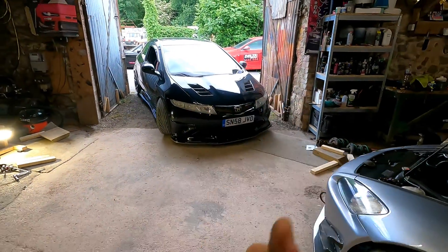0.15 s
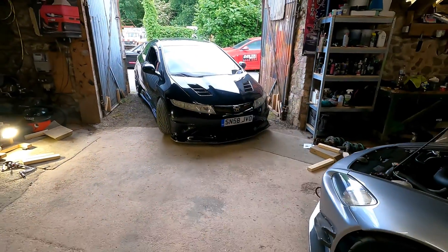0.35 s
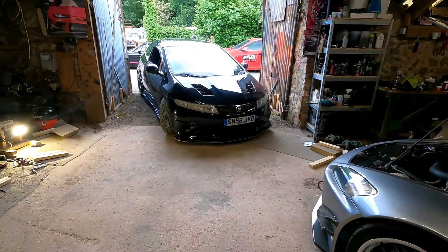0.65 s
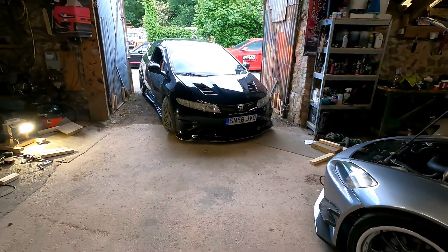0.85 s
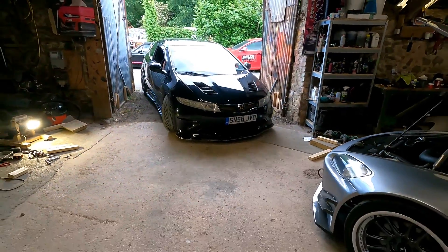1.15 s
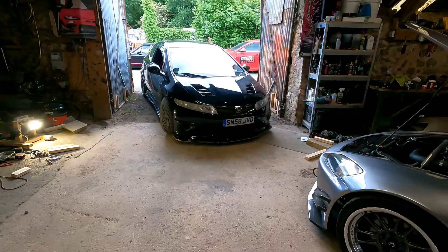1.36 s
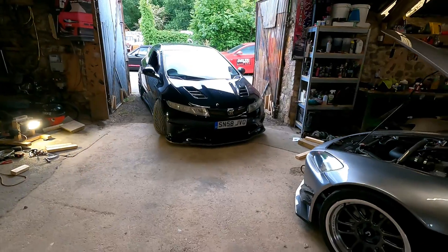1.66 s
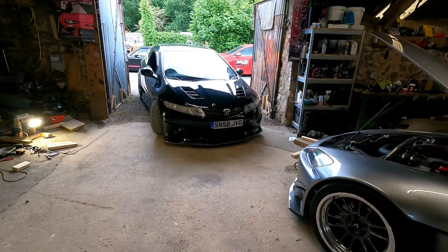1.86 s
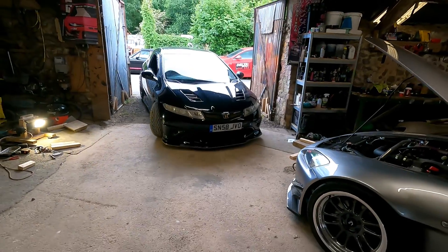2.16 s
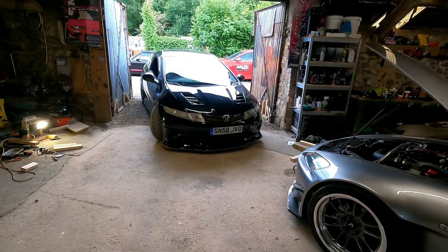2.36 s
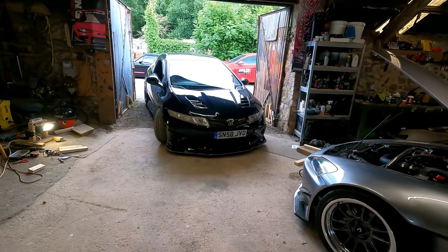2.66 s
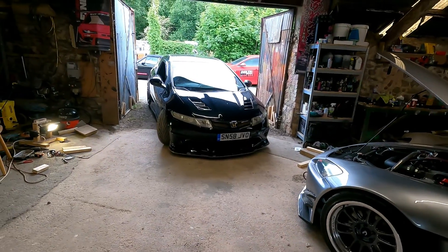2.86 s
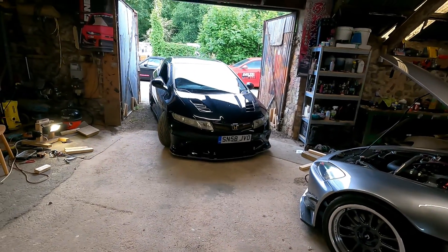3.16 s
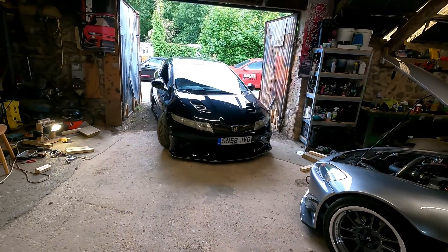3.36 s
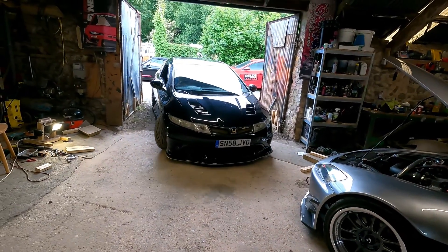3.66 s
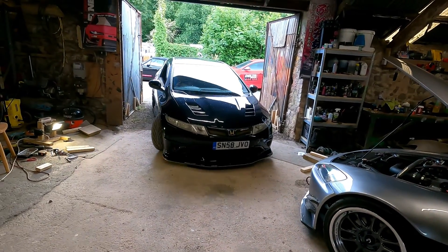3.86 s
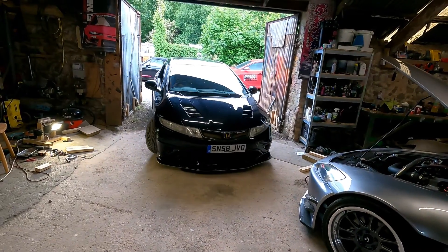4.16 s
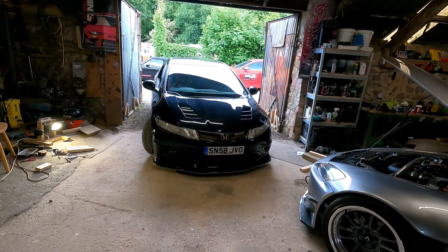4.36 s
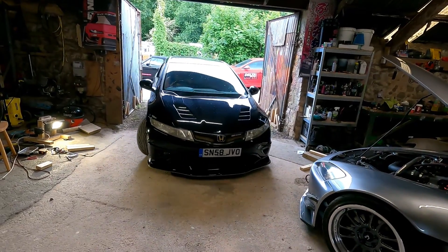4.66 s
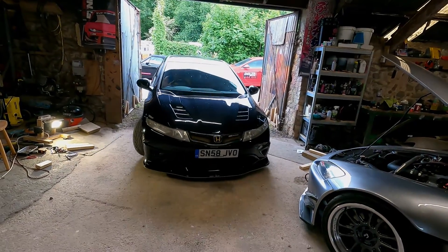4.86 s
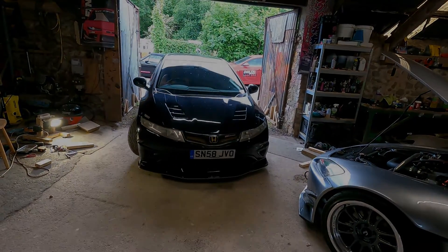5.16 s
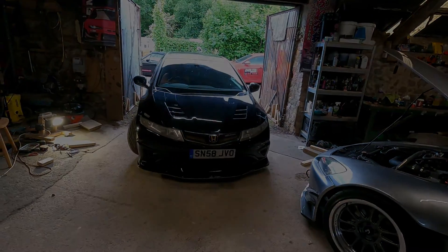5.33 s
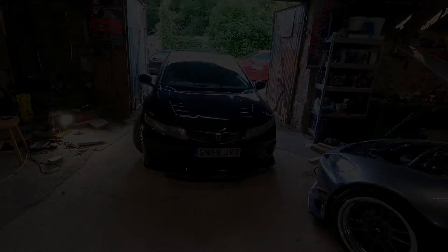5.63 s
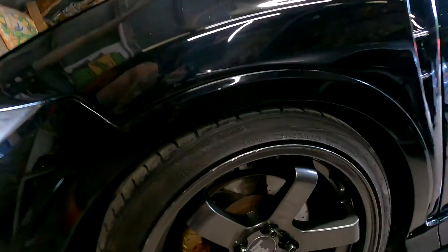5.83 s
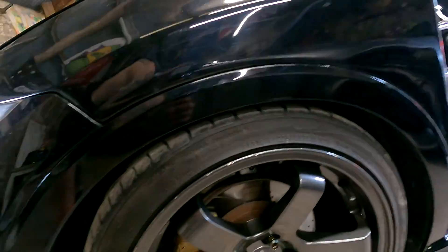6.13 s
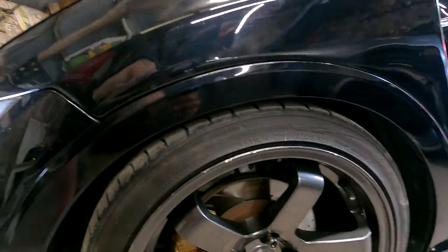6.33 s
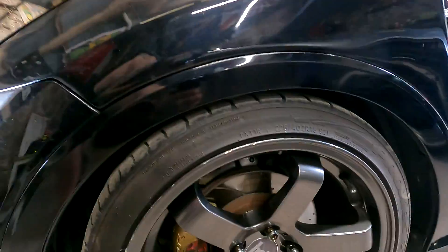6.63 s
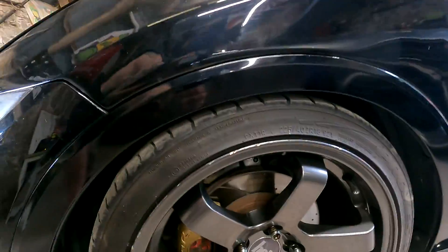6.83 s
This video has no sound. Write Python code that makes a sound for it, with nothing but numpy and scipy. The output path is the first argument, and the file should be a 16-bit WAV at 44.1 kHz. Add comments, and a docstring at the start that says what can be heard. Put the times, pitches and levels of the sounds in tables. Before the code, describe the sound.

A four-cylinder car idles into a workshop, gets two quick throttle revs, settles and fades to silence, then idles again close beside the wheel.

```python
"""Car revved in a workshop

A four-cylinder car idles into a workshop, is revved twice and settles; the sound fades to silence.
After a cut the microphone is beside the wheel of the idling car. Exhaust tones are cosines locked to
the firing phase, booming in pipe and shed; engine bay, gas flow and intake are shaped noise, with
ringing modes for the block, wavering sines for the whistle and short knocks for grit under the tyres."""
import sys
import numpy as np
from scipy import signal
from scipy.fft import rfft, irfft, next_fast_len
from scipy.io import wavfile
from scipy.ndimage import uniform_filter1d, map_coordinates

SR = 44100
rng = np.random.default_rng(int(sys.argv[2]) if len(sys.argv) > 2 else 0)


def waveform_to_disk(signal):
    """Save audio, clipped to [-1, 1], as 16-bit WAV at the path in sys.argv[1]."""
    frames = np.transpose(np.atleast_2d(signal))
    scaled = np.clip(frames, -1, 1) * 32767
    samples = np.round(scaled).astype(np.int16)
    wavfile.write(sys.argv[1], SR, samples)


def volts_from_decibels(level):
    """Turn decibel levels (scalar or array-like) into linear amplitude factors."""
    exponent = np.asarray(level, float) / 20
    return 10 ** exponent


N = 308259
CUT = 5.826  # s, the microphone moves to the wheel


def unit(x):
    """Scaled to rms 1."""
    return x / np.sqrt(np.mean(x ** 2) + 1e-20)


def along(points, hz):
    """Reads (f/Hz, value) points on a log frequency axis."""
    f, value = np.transpose(points)
    return np.interp(np.log(hz + 1), np.log(f + 1), value)


def curves(rows):
    """One value per sample for each column after the time."""
    s, *columns = np.transpose(rows)
    return [np.interp(np.arange(N) / SR, s, column) for column in columns]


def wobble(rate):
    """A smooth random curve with rate knots a second."""
    return map_coordinates(rng.standard_normal(N // 200), [np.arange(N) * rate / SR])


def between(t0, t1, edge):
    """Gate: 1 from t0 to t1, with soft edges in seconds."""
    t = np.arange(N) / SR
    opening = np.clip((t - t0) / edge + 0.5, 0, 1)
    closing = np.clip((t1 - t) / edge + 0.5, 0, 1)
    return opening * closing


def filtered(x, response):
    """x times a complex response of frequency, padded so that tails do not wrap."""
    m = next_fast_len(N + SR)
    return irfft(rfft(x, m) * response(np.fft.rfftfreq(m, 1 / SR)), m)[..., :N]


def resonances(modes):
    """Causal response of (f/Hz, width/Hz, level/dB) modes, alternating in sign."""
    def response(f):
        total = 0
        for i, (centre, width, db) in enumerate(modes):
            damping = 1j * f * width
            total = total + (-1) ** i * volts_from_decibels(db) * damping / (centre ** 2 - f ** 2 + damping)
        return total
    return response


# likeness of left and right before the spread is applied: (f/Hz, correlation)
LIKENESS = [(60, .998), (180, .99), (540, .75), (1600, .7), (4800, .7), (8000, .85), (14000, .6)]


def noise(spectrum, spread):
    """Stereo noise of rms 1; spread scales the angle by which left and right differ."""
    def mid_side(hz):
        angle = spread * np.arccos(np.clip(along(LIKENESS, hz), -1, 1)) / 2
        return volts_from_decibels(along(spectrum, hz)) * [np.cos(angle), np.sin(angle)]
    mid, side = filtered(rng.standard_normal((2, N)), mid_side)
    return unit(np.array([mid + side, mid - side]))


# engine speed: (t/s, firing rate f/Hz)
ENGINE_SPEED = [(0.1, 28.24), (0.4, 26.9), (0.82, 26.7), (1.2, 27.57), (1.55, 28.48), (2.58, 28.3),
                (2.71, 28.68), (2.76, 35.86), (2.87, 43.8), (2.93, 62.9), (2.99, 67.4), (3.25, 81.7),
                (3.37, 111.9), (3.44, 122.3), (3.49, 122.9), (3.56, 114.1), (3.75, 92.4), (3.87, 82.56),
                (4.15, 67.46), (4.3, 60.54), (4.46, 56.47), (4.68, 49.08), (4.84, 44.45), (4.96, 42),
                (5.24, 34.28), (5.41, 31.56), (5.8, 27.16), (5.83, 28.1), (6.2, 27.77), (6.36, 27.85),
                (6.45, 28.09), (6.99, 28.14)]


def crank():
    """Firing rate in Hz and firing phase in radians, the clock of every engine sound."""
    rate, = curves(ENGINE_SPEED)
    return rate, 2 * np.pi * np.cumsum(rate) / SR


def exhaust(rate, phase):
    """Everything that leaves the tail pipe before the cut: tones and the gas flow that follows them."""
    tones = idle(phase) + rev(rate, phase)
    return tones + turbulence(tones)


# idling in: (t/s, orders up to the fifth level/dB, orders around the boom level/dB,
# seventh order level/dB, tone a quarter order below it level/dB)
IDLE_LEVELS = [(0.0, -38, -15, -10.5, -35), (0.14, -36, -41, -9, -43), (0.36, -34.5, -32, -30.5, -44),
               (0.6, -32.5, -35, -28, -31), (0.75, -33, -38, -29, -19.5), (0.98, -32, -35, -15, -26),
               (1.12, -31, -31, -20.5, -24), (1.32, -31.5, -29, -18.5, -16.5),
               (1.7, -29.5, -22.5, -19, -27.5), (2.1, -29, -24.5, -24, -25), (2.5, -30.5, -23, -24, -30),
               (2.7, -32, -25.5, -26, -26)]
# balance of the idle orders: (multiple of the firing rate, relative level/dB)
IDLE_ORDERS = [(1, -4), (2, -3), (3, 0), (4, 0.5), (5, -3), (6, 0.5), (8, -0.5), (9, -39), (10, -12.5),
               (12, -19)]
BOOM_ORDER, LOW_BOOM_ORDER = 7, 3  # the orders on the pipe's booms at idle


def idle(phase):
    """Wavering orders; the seventh meets the pipe's boom and, the cylinders being uneven,
    throbs once in four firings."""
    low_db, high_db, boom_db, quarter_db = curves(IDLE_LEVELS)
    drift, waver_db = 0.3, 1.6  # radians, dB
    throb_rad = 0.47  # where in the four-firing cycle the boom is fullest
    orders = 0
    for k, db in IDLE_ORDERS:
        level_db = (low_db if k <= 5 else high_db) + db + waver_db * wobble(5.62)
        orders = orders + volts_from_decibels(level_db) * np.cos(k * phase + 0.7 * k * k + drift * wobble(7.1))
    seventh = BOOM_ORDER * phase + drift * wobble(5)
    quarter_below = seventh - phase / 4 + throb_rad
    boom = volts_from_decibels(boom_db) * np.sin(seventh) + volts_from_decibels(quarter_db) * np.sin(quarter_below)
    return np.sqrt(2) * (orders + boom) * between(-1, REV_LEVELS[0][0], edge=0.031)


# booms of pipe and shed: (f/Hz, width/Hz, level/dB)
PIPE_BOOMS = [(38, 8.1, -8), (69.7, 12, 9), (125, 9.8, -0.5), (191.5, 12, 1.5), (221.6, 16.5, 1.5)]
# colour of the gas flow, here and beside the wheel: (f/Hz, relative level/dB per Hz)
RUMBLE_COLOUR = [(6, -12), (25, -8), (70, -0.5), (200, 15), (240, 1.5), (450, -28), (600, -42)]


def turbulence(tones):
    """Unsteady gas flow, following the tones well under them, rumbles and rings the low booms."""
    flow_db, follow_s = -14.5, 0.048  # level against the tones; time over which it follows them
    least_db = -30.5  # the flow never quite stops before the cut
    tone_level = np.sqrt(np.abs(uniform_filter1d(tones ** 2, size=round(follow_s * SR))))
    level = volts_from_decibels(flow_db) * tone_level + volts_from_decibels(least_db)
    booms = unit(filtered(noise(RUMBLE_COLOUR, spread=1.2), resonances(PIPE_BOOMS)))
    rumble = volts_from_decibels(-7.0) * noise(RUMBLE_COLOUR, spread=0.96)
    return level * (booms + rumble) * between(-1, CUT, edge=0.03)


# engine bay before the change of colour: (t/s, rush level/dB, growl level/dB)
BAY_LEVELS = [(0.0, -33.5, -29.5), (0.3, -33.5, -29.5), (0.8, -32.5, -29), (2.58, -31.5, -29),
              (3.6, -31, -26.5), (3.93, -36, -32), (4.84, -34, -33.5), (5.82, -36, -33.5),
              (5.84, -38, -36.5), (6.02, -35, -35), (6.8, -31.5, -31.5), (6.95, -31, -31)]
# bright rush of fan and belts: (f/Hz, relative level/dB per Hz)
RUSH_COLOUR = [(760, -41), (1300, -11), (1480, -6), (1820, -5), (2190, -6), (2630, -10), (3030, -8),
               (4510, -10), (7510, -17.5), (12300, -32.5), (13700, -52), (14900, -56)]
# darker growl: (f/Hz, relative level/dB per Hz)
GROWL_COLOUR = [(150, -6), (250, -2), (274, -7.5), (341, -9), (552, -9.5), (759, -12.5), (1120, -9),
                (1240, -10), (1380, -7), (1870, -21), (2200, -12.5), (2860, -30.5), (4840, -120)]
# ringing of engine block and covers: (f/Hz, width/Hz, level/dB)
BLOCK_MODES = [(912, 12, 2), (1006, 19, -1), (1317, 35, -3), (1448, 52, -1.5), (1544, 35, 2.5),
               (1900, 42, -2.5), (2080, 48, -5), (2280, 43, -1.5), (4570, 140, -10.5)]
# change of colour beside the wheel: (f/Hz, gain level/dB)
NEARER_COLOUR = [(300, -2), (400, 2), (500, 0), (900, 3.5), (1400, 1), (1900, 1.5), (2300, 0.5),
                 (3000, 1.5), (8000, 0.5)]


def engine_bay(phase):
    """Fan and belts rush, the block rings; valve gear clatters once per firing, some strokes harder."""
    rush_db, growl_db = curves(BAY_LEVELS)
    stroke = np.exp(-(phase % (2 * np.pi)) / 1.16) * volts_from_decibels(4.7 * wobble(28))
    flutter_db = 0.5 * wobble(10)
    rush = volts_from_decibels(rush_db + flutter_db) * unit((1 + 0.43 * stroke) * noise(RUSH_COLOUR, spread=1.09))
    growl = volts_from_decibels(growl_db + flutter_db) * unit((1 + 0.11 * stroke) * noise(GROWL_COLOUR, spread=0.88))
    strikes = (1 + 0.22 * stroke) * noise([(500, 0.0051), (6000, 0)], spread=0.87)
    ring = volts_from_decibels(growl_db - 7.0) * unit(filtered(strikes, resonances(BLOCK_MODES)))
    far = rush + growl + ring
    near = filtered(far, lambda hz: volts_from_decibels(along(NEARER_COLOUR, hz)))
    return np.where(np.arange(N) < CUT * SR, far, near)


# grit under the tyres: (t/s, level/dB before filtering, knock f/Hz, crack level/dB against the snap)
GRIT_SNAPS = [(1.1137, -9.5, 1110, -25), (2.0817, -7, 2260, -4), (2.613, -16, 1567, -20)]
# wall echoes of a snap: (delay t/s, level/dB before dulling)
WALL_ECHOES = [(.0105, -6), (.0185, -8), (.03, -16)]


def ticks():
    """Each snap is a short knock with a crack that dies in the shed; walls send back duller copies."""
    out, t = np.zeros(N + SR), np.arange(SR // 10) / SR
    for s, db, hz, crack_db in GRIT_SNAPS:
        knock = np.sin(2 * np.pi * hz * t) * volts_from_decibels(-60 * t / 0.01)
        knock = knock - np.sin(np.pi * hz * t) * volts_from_decibels(-60 * t / 0.0067)  # an octave lower, shorter
        decay = volts_from_decibels(-60 * t / 0.015) + 0.2 * volts_from_decibels(-60 * t / 0.12)
        crack = volts_from_decibels(crack_db) * rng.standard_normal(len(t)) * decay
        out[round(s * SR):][:len(t)] += volts_from_decibels(db) * (knock + crack)

    def shed(f):
        echoes = sum(volts_from_decibels(db) * np.exp(-2j * np.pi * f * s) for s, db in WALL_ECHOES)
        walls = 1 + echoes / (1 + 1j * f / 1900) ** 2
        return walls * 1j * f / (600 + 1j * f) / (1 + 1j * f / 6000) ** 2  # thinned below, dulled above
    return filtered(out[:N], shed)


def swells(rows, column, fall):
    """Gain of events that climb to their peak, then die away at fall dB a second; powers add."""
    rise_db = 23.5  # climbed during one rise time
    t = np.arange(N) / SR
    power = 0
    for row in rows:
        peak, rise = row[:2]
        below_db = np.where(t < peak, rise_db * (peak - t) / rise, fall * (t - peak))
        power = power + volts_from_decibels(row[column] - below_db) ** 2
    return np.sqrt(power)


# throttle opens: (peak t/s, rise t/s, hiss level/dB, gulp level/dB)
THROTTLE_STABS = [(2.694, 0.084, -23.5, -24.5), (2.8, .04, -28.5, -34), (3.152, 0.033, -25, -23.5),
                  (3.346, 0.058, -38.5, -28)]
# whistle swells: (peak t/s, rise t/s, level/dB)
WHISTLE_SWELLS = [(2.618, 0.0061, -22), (2.64, .02, -26), (2.7, 0.038, -21), (2.73, 0.033, -24.5),
                  (2.755, 0.026, -19), (3.16, .03, -30), (3.346, .05, -37)]
# roar swells: (peak t/s, rise t/s, level/dB)
ROAR_SWELLS = [(2.628, .03, -35), (2.7, 0.025, -25), (2.76, 0.039, -23), (3.05, 0.1, -27),
               (3.155, 0.027, -26), (3.26, 0.083, -22.5), (3.33, 0.063, -16.5), (3.38, 0.096, -20.5)]
# singing modes of the air box: (f/Hz, width/Hz, relative level/dB)
AIRBOX_MODES = [(550, 40, -7), (1165, 24, 0), (1565, 40, -3), (2130, 80, -13)]
# colour of the throttle hiss: (f/Hz, relative level/dB per Hz)
HISS_COLOUR = [(2940, -25), (5000, 1), (6060, -7), (7610, 0.5), (8260, -5.5), (8970, 1), (9340, -11),
               (10000, -4), (13100, -21), (14900, -34)]
# colour of the gulp of air: (f/Hz, relative level/dB per Hz)
GULP_COLOUR = [(1060, -19), (1800, 0), (1960, -27), (2150, 1), (2920, -11.5), (3270, 1), (3940, -5.5),
               (5240, -10.5), (6500, -13), (8450, -42), (14300, -120)]
# colour of the full-load roar: (f/Hz, relative level/dB per Hz)
ROAR_COLOUR = [(290, -46), (500, -24), (633, 6), (729, -7.5), (1350, 2), (1700, -9.5), (2060, -13),
               (2500, -15.5), (3250, -15), (5500, -120)]


def intake(phase):
    """Air tears past the opening throttle, sings in the air box and roars at full load."""
    t = np.arange(N) / SR
    strokes = unit(1 + 0.32 * np.cos(phase))  # each intake stroke gulps once
    breathy = unit(filtered(rng.standard_normal(N), lambda f: resonances(AIRBOX_MODES)(f) ** 2))
    clear = 0
    for hz, width, db in AIRBOX_MODES:  # a wider mode wavers faster
        tone = np.sin(2 * np.pi * hz * t + 1.36 * wobble(width))
        clear = clear + volts_from_decibels(db + 3.6 * wobble(width)) * tone
    whistle = swells(WHISTLE_SWELLS, column=2, fall=330) * (unit(clear) + volts_from_decibels(-2) * breathy)
    hiss = swells(THROTTLE_STABS, column=2, fall=80) * noise(HISS_COLOUR, spread=0.87)
    gulp = swells(THROTTLE_STABS, column=3, fall=140) * noise(GULP_COLOUR, spread=1.0)
    roar = swells(ROAR_SWELLS, column=2, fall=125) * strokes * noise(ROAR_COLOUR, spread=1.0)
    return hiss + gulp + roar + whistle


# revving and settling: (t/s, load level/dB, overtones over the firing order level/dB,
# third order over the other overtones level/dB, rasp level/dB)
REV_LEVELS = [(2.71, -36, 14.5, 10, -27), (2.79, -16.5, 3, 2, -23.5), (2.86, -13.5, -3, 2, -19.5),
              (2.93, -26.5, 8, 2, -22.5), (3.02, -18, 8.5, -3, -17.5), (3.15, -20.5, -6.5, 4, -32),
              (3.25, -9.5, -7, 10.5, -16.5), (3.33, -8, -14.5, 5, -17), (3.41, -25.5, 10.5, 1, -21),
              (3.52, -31.5, 4.5, 2, -37), (3.65, -11.5, -13.5, 5, -32), (3.8, -15, 0.5, 9, -27),
              (4.0, -18.5, -12, 7, -35), (4.2, -17, -8, -15, -38), (4.33, -21.5, -2, -3.5, -39),
              (4.46, -31, 8.5, -1, -44), (4.62, -23, 0.5, -4, -47), (4.95, -13, -13, -6, -45.5),
              (5.06, -12.5, -13, -8, -44), (5.28, -14, -13, 5, -40), (5.42, -27.5, -18, -4, -52),
              (5.55, -35, -10, -4, -48), (5.8, -30, 13, -6, -44)]
# balance of the revving orders: (multiple of the firing rate, relative level/dB)
REV_ORDERS = [(1, 0.5), (2, 0.5), (3, -2.5), (4, 0), (5, -5.5), (6, -11.5), (7, -8.5), (8, -8)]
# standing waves of pipe and shed that every order glides through: (f/Hz, gain level/dB)
STANDING_WAVES = [(28, 1), (40, -1.5), (56, -11), (68, 5.5), (82, -1), (95, -10.5), (101, -4.5), (112, -4),
                  (121, 11), (134, 2.5), (151, -11), (166, 2.5), (173, 4.5), (184, 7), (202, 6), (213, 2),
                  (227, 9.5), (245, -2), (258, -15), (275, -25), (320, -18.5), (450, -29), (740, -38)]
# silencer modes: (f/Hz, width/Hz, level/dB)
SILENCER_MODES = [(286.5, 12.6, 4), (336, 20, -1), (402.2, 14, 1), (553, 34, -12), (610.4, 11.7, -5)]


def rev(rate, phase):
    """Low orders swell and fade as they glide through the standing waves; uneven overtones and
    puffs of gas rasp in the silencer."""
    load_db, over_db, third_db, rasp_db = curves(REV_LEVELS)
    low = 0
    for k, db in REV_ORDERS:
        level_db = load_db + db + over_db * (k > 1) + third_db * (k == 3)
        level_db = level_db + along(STANDING_WAVES, k * rate) + 0.8 * wobble(16)
        low = low + np.sqrt(2) * volts_from_decibels(level_db) * np.cos(k * phase + 1.1 * k ** 2)
    overtones = volts_from_decibels(1.5 * wobble(30)) * sum(np.cos(k * phase) for k in range(4, 16))
    puffs = volts_from_decibels(20.5) * (1 + np.cos(phase)) * rng.standard_normal(N)
    rasp = filtered(overtones + puffs, resonances(SILENCER_MODES))
    # level the rasp over a quarter second, so that the table alone sets its loudness
    rasp = rasp / np.sqrt(np.abs(uniform_filter1d(rasp ** 2, size=SR // 4)) + 1e-12)
    return (low + volts_from_decibels(rasp_db) * rasp) * between(REV_LEVELS[0][0], CUT, edge=0.021)


# air through the radiator at high revs: (t/s, level/dB)
RADIATOR_AIR = [(3.3, -42.5), (3.42, -30), (3.55, -29.5), (3.68, -30.5), (3.8, -36.5), (3.95, -40),
                (4.2, -37.5), (4.32, -51), (4.4, -50)]


def whoosh():
    """A broad band of air noise while the fan spins fast."""
    colour = [(1300, -17.5), (1600, -4), (2000, -3), (2250, 1), (2600, -10.5), (3300, -22),
              (4400, -15), (6000, -46)]  # (f/Hz, relative level/dB per Hz)
    gate = between(RADIATOR_AIR[0][0], RADIATOR_AIR[-1][0], edge=0.05)
    return volts_from_decibels(curves(RADIATOR_AIR)[0]) * noise(colour, spread=1.06) * gate


# engine beside the wheel: (t/s, exhaust orders level/dB)
CLOSE_LEVELS = [(5.83, -24.5), (6.3, -21.5), (6.5, -18.5), (6.99, -18.5)]
# balance of the orders beside the wheel: (multiple of the firing rate, relative level/dB)
CLOSE_ORDERS = [(1, -5), (2, -11), (3, -5), (4, -12), (5, -18), (6, -11), (7, 0), (8, -8), (9, -29),
                (10, -22)]


def exhaust_close(phase):
    """Idle near the wheel: gently wavering orders; each boom of the pipe inverts those above it."""
    orders = 0
    for k, db in CLOSE_ORDERS:
        inversions = (k > BOOM_ORDER) + (k > LOW_BOOM_ORDER)
        angle = k * phase + 0.04 * k * k + np.pi * inversions + 0.2 * wobble(9)
        orders = orders + volts_from_decibels(db + wobble(7)) * np.cos(angle)
    # uneven cylinders sound between the orders
    half = volts_from_decibels(-9 + 4.2 * wobble(4.1)) * np.sin(2.5 * phase)
    rumble = volts_from_decibels(-17) * noise(RUMBLE_COLOUR, spread=1.1)
    after_cut = np.arange(N) >= CUT * SR
    return volts_from_decibels(curves(CLOSE_LEVELS)[0]) * after_cut * (unit(orders) + half + rumble)


def scene():
    """All sources; the sound fades out evenly before the cut and opens quickly after it."""
    rate, phase = crank()
    t = np.arange(N) / SR
    fade_from = 4.81  # s
    fade_out = np.clip((CUT - 0.004 - t) / (CUT - fade_from), 0, 1)
    fade_in = np.clip((t - CUT) / 0.019, 0, 1)
    car = exhaust(rate, phase) + engine_bay(phase) + intake(phase) + whoosh() + exhaust_close(phase)
    return np.where(t < CUT, fade_out, fade_in) * (car + ticks())


def top_cut(x):
    """Nothing passes above the cut-off."""
    return signal.sosfilt(signal.butter(12, 15030, fs=SR, output="sos"), x)


# colour of the two microphone ports: (f/Hz, left minus right level/dB)
PORT_BALANCE = [(200, -.5), (500, -1.8), (1000, -.3), (4000, -.7), (8000, -.2)]


def record(dry):
    """Two microphone ports of slightly different colour; the loudest peaks clip, the top is cut off."""
    sides = np.array([[1], [-1]])
    ports = filtered(dry, lambda hz: volts_from_decibels(along(PORT_BALANCE, hz) / 2 * sides))
    clipped = ports / (1 + np.abs(ports) ** 16) ** (1 / 16)
    finished = filtered(clipped, lambda hz: hz < 15000)
    return top_cut(finished)


dry = scene()
out = record(dry)
waveform_to_disk(out)
```